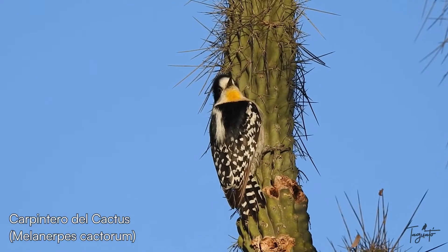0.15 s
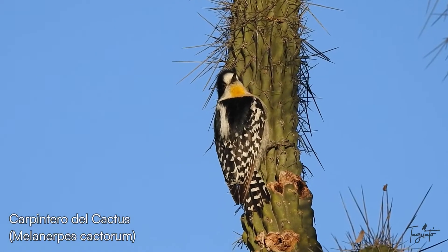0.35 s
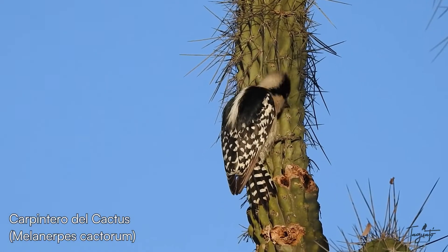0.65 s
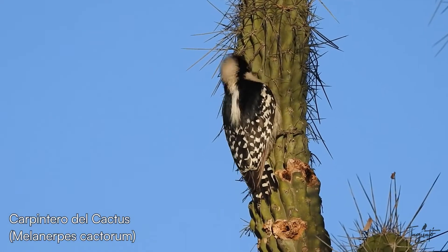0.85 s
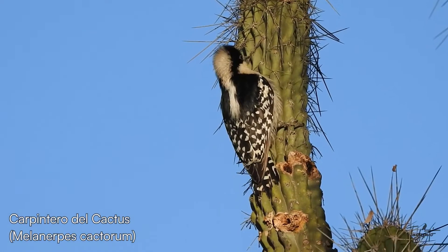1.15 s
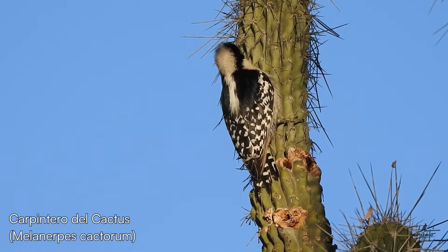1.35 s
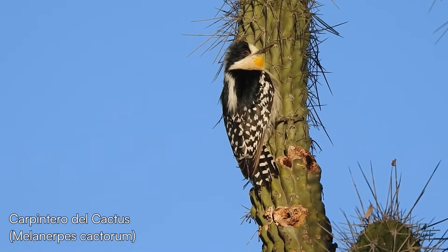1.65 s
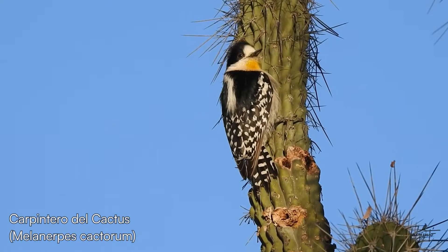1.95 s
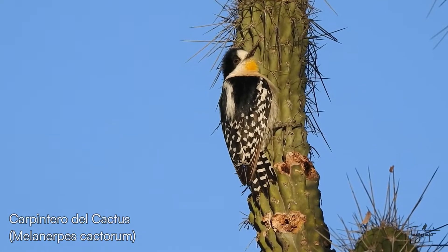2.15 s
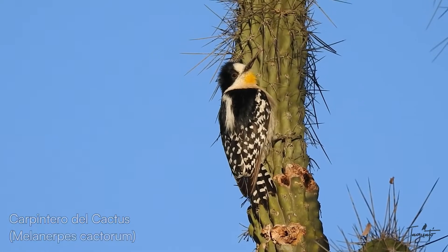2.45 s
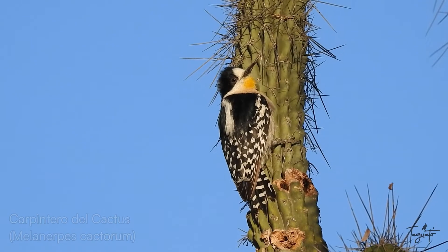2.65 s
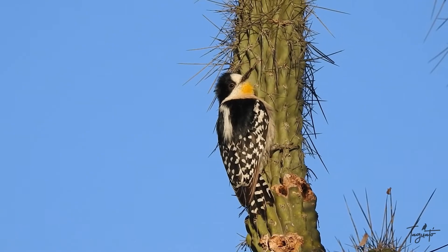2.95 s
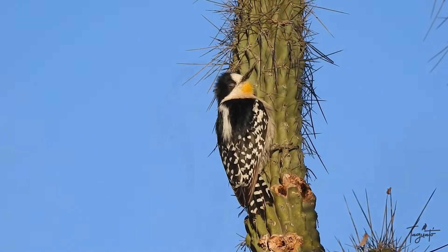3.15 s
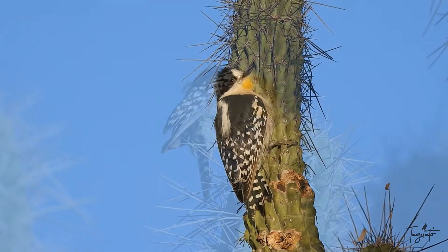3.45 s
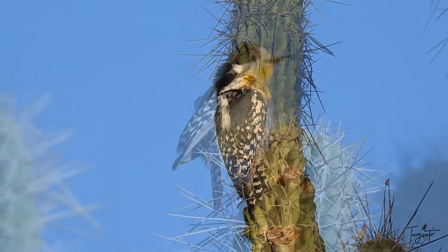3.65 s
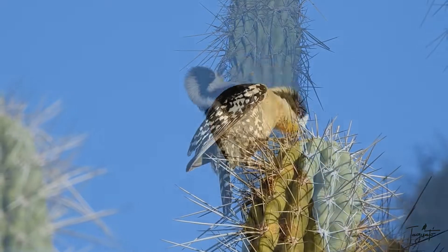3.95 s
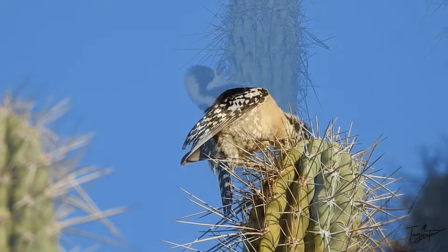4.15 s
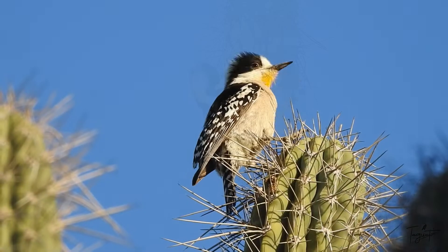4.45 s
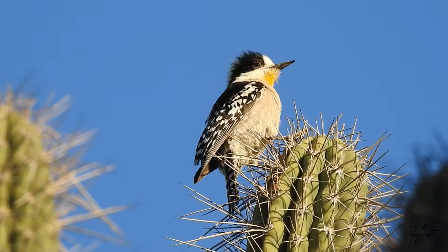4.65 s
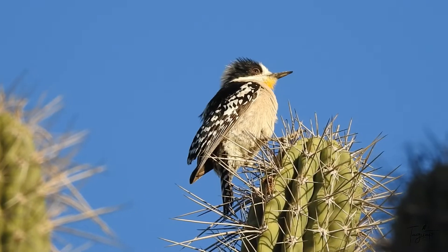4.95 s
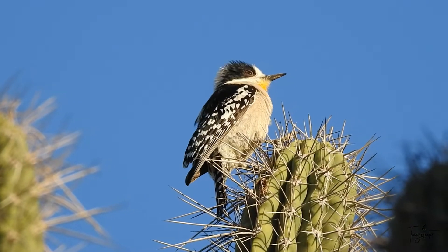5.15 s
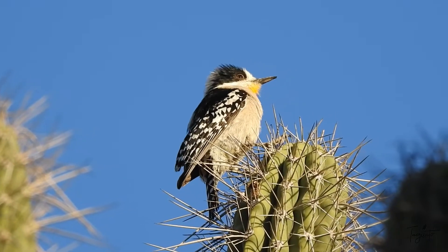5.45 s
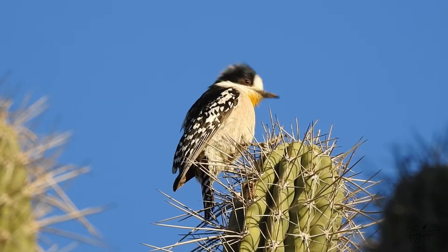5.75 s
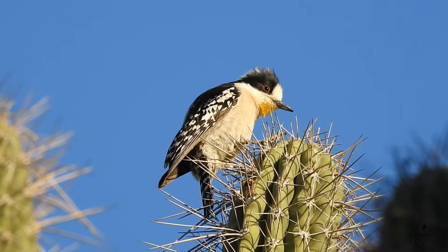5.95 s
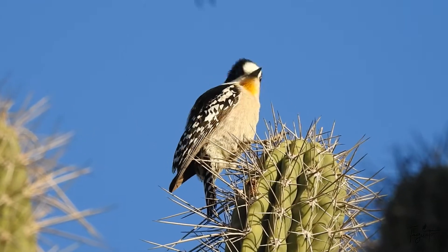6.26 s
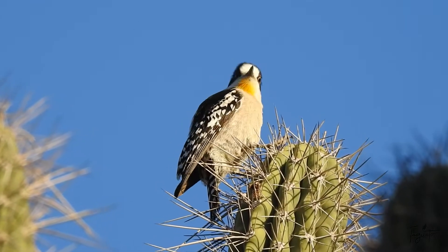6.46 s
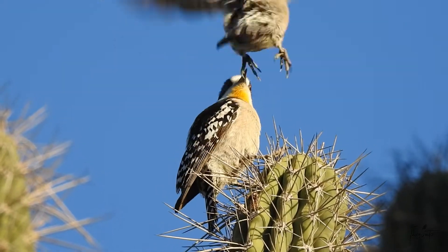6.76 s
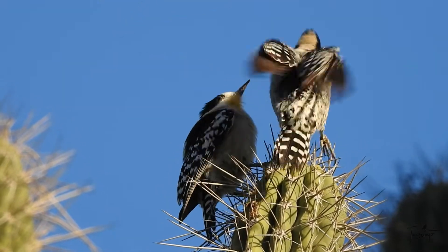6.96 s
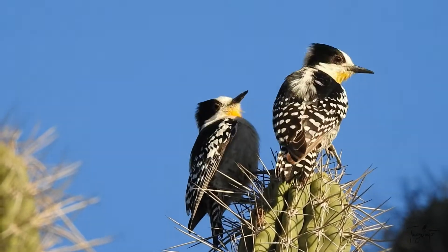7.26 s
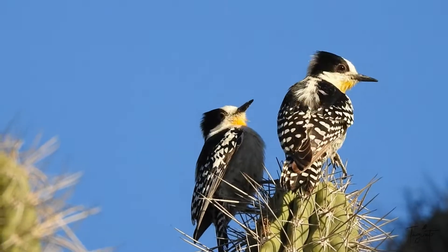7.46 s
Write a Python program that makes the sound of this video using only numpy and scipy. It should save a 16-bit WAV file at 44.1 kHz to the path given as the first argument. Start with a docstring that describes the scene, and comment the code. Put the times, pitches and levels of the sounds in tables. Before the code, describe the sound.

Woodpeckers chatter outdoors in overlapping bouts of high chirps and squealing notes, with distant whistles and rasps over a faint low hum.

```python
"""Short falling chirps and a slurred whistle come first: woodpeckers chatter in open scrub.
Then a bird near the microphone gives loud squealing notes in bouts, and the others answer.
Thin whistles, piping, small arched chirps and nasal rasps come from birds farther off. Each voice
is a vibrating membrane shaped by a throat, and ground and plants scatter its echoes.
A faint throbbing hum and a little air noise lie underneath."""
import sys
import numpy as np
from scipy import signal
from scipy.fft import rfft, irfft, next_fast_len
from scipy.io import wavfile

SR = 44100
rng = np.random.default_rng(int(sys.argv[2]) if len(sys.argv) > 2 else 0)


def wav_record(signal):
    """Record a signal, one row per channel, as 16-bit PCM in the file named by sys.argv[1]."""
    frames = np.transpose(np.atleast_2d(signal))
    bounded = np.clip(frames, -1, 1)
    # unit amplitude maps onto the largest positive 16-bit level
    quanta = np.round(bounded * 32767).astype(np.int16)
    wavfile.write(sys.argv[1], SR, quanta)


N = 336042
BAND_LIMIT_HZ, LEAD_S = 15660, .039

# The bird near the microphone, timed at the break of its voice: break_s, level_db, pitch_hz, squeal_s
NEAR_NOTES = [(2.483, -35, 1867, .022), (2.625, -35.5, 1860, 0.023), (2.772, -34.5, 1904, 0.017),
              (2.893, -34, 1934, .023), (3.04, -36.5, 1840, 0), (3.274, -34.5, 1908, 0.021),
              (3.411, -35.5, 1775, 0.0031), (3.767, -34.5, 1815, 0.0031), (3.894, -34, 1886, 0.024),
              (4.122, -37, 1870, .018), (4.251, -36, 1887, 0.00026), (4.385, -36.5, 1877, 0.0014),
              (4.721, -34.5, 1795, 0), (4.874, -35.5, 1757, 0), (5.146, -41, 1590, 0.021),
              (5.329, -44, 1586, 0.0013), (5.523, -35.5, 1763, 0.0019), (5.794, -36.5, 1848, .02),
              (6.505, -35, 1862, .026), (6.662, -35, 1805, 0), (6.812, -35, 1910, 0.02),
              (7.167, -35.5, 1780, 0), (7.588, -35, 1867, 0.02)]
def near_woodpecker(lead_follows=.6, usual_db=-37):
    """A grating lead-in breaks into a falling stack; in some notes a squeal takes its first part."""
    out = np.zeros(N)
    for break_s, db, hz, squeal_s in NEAR_NOTES:
        lead_db = usual_db + lead_follows * (db - usual_db)
        add(out, break_s - LEAD_S, gain_of(lead_db) * lead_in())
        add(out, break_s, gain_of(db) * fall(hz, squeal_s))
        if squeal_s > .005:
            add(out, break_s, gain_of(db) * squeal(hz, squeal_s))
    return out

# The near bird's throat in the lead-in: frequency_hz, gain_db
LEAD_THROAT = [(2350, 26), (4600, -4), (7000, -11), (9500, -49)]
def lead_in(top_hz=2386, arch=.061, rough=.34, hiss_db=-5.5, overlap_s=.0046):
    """A grating, hissy tone on a nearly level pitch swells up to the break of the voice."""
    t = np.arange(-LEAD_S, overlap_s, 1 / SR)
    u = np.linspace(0, 1, len(t))
    tone = syrinx(top_hz * (1 - arch * (2 * u - 1) ** 2), rough, LEAD_THROAT, order=4)
    level = gain_of(-11 + 6.5 * u) * gate(t, attack_s=.0063, release_s=.005)
    return level * (tone + gain_of(hiss_db) * hiss(len(t), low_hz=2800, high_hz=6300))

# The near bird's throat after the break: frequency_hz, gain_db
FALL_THROAT = [(1000, -33), (1450, -4.5), (1900, -14.5), (2900, 2), (3700, 2.5), (4500, -6.5), (5400, -0.5),
               (6300, -18.5), (7400, -18.5), (9200, -22.5), (11000, -52), (15000, -54)]
def fall(hz, squeal_s, length_s=.044, fade_db=-21.5, break_s=.0042, switch_s=.0023):
    """A stack of harmonics drops ever faster, fading and roughening; it waits out the squeal."""
    t = np.arange(0, length_s, 1 / SR)
    u = t / length_s
    pitch = hz * (1.06 - .18 * u - .4 * u ** 2)
    rough = .056 + .43 * u ** 3 + .46 * np.exp(-t / break_s)
    level = gain_of(3.5 + fade_db * u ** 2.49) * gate(t, attack_s=.0035, release_s=.0096)
    after_squeal = np.clip((t - squeal_s) / switch_s + 1, 0, 1)
    return level * after_squeal * syrinx(pitch, rough, FALL_THROAT)

# The throat in the near squeal and the distant arched chirps: frequency_hz, gain_db
SQUEAL_THROAT = [(3800, 1), (7600, -22), (11500, -34.5)]
def squeal(hz, length_s, arch=.071, flutter_hz=740, flutter_depth=.83, attack_s=.0023, hiss_db=-15):
    """A hissy tone an octave up; a second, slower vibration chops it and gives it side tones."""
    t = np.arange(0, length_s + attack_s, 1 / SR)
    u = t / length_s
    flanks = 1 - np.exp(-((u - .35) / .17) ** 2)  # zero where the squeal is cleanest and loudest
    turns = np.cumsum(flutter_hz * (1 + .15 * wobble(len(t), 680))) / SR
    flutter = 1 + flutter_depth * flanks * (np.cos(2 * np.pi * turns) + .27 * np.cos(4 * np.pi * turns))
    pitch = 2 * hz * (1.02 - arch * (2 * u - 1) ** 2)
    tone = syrinx(pitch, rough=.14, throat=SQUEAL_THROAT, order=3) * flutter
    tone = gain_of(7.5 - 8.5 * flanks) * unit_rms(resonate(tone, hz=2600, width_hz=1900))
    noise = gain_of(hiss_db) * hiss(len(t), low_hz=4800, high_hz=7400)
    return gate(t, attack_s, release_s=.0044) * (tone + noise)

# Woodpeckers answering from the scrub: time_s, level_db, nominal_second_harmonic_hz
ANSWERS = [(0.0014, -36.5, 4720), (0.178, -35, 4695), (0.3613, -32.5, 4885), (0.564, -38, 4735),
           (0.7416, -34.5, 4860), (0.9438, -34, 4870), (1.0184, -43.5, 5490), (1.1104, -32.5, 5050),
           (1.1978, -38.5, 4980), (1.2746, -32.5, 4950), (1.3433, -39, 4920), (1.4581, -33.5, 4760),
           (1.6127, -40, 4830), (1.6457, -34.5, 4890), (1.7376, -41.5, 4840), (1.8445, -37, 4680),
           (1.8842, -38.5, 5000), (2.0148, -32, 4920), (2.1495, -43, 4980), (2.1925, -37, 4716),
           (2.3596, -38, 4910), (2.5264, -38.5, 4990), (2.7354, -39, 4990), (4.2106, -36, 4820),
           (4.5412, -34, 4917), (4.6936, -35, 4896), (4.8316, -33.5, 4870), (4.9807, -33.5, 4860),
           (5.1384, -31.5, 4925), (5.297, -33.5, 4950), (5.4755, -36, 4650), (5.646, -33.5, 4700),
           (5.8122, -33.5, 4796), (5.9389, -43, 4605), (6.0737, -37.5, 4860), (6.2228, -40.5, 4760),
           (6.364, -41, 4910), (7.0984, -35.5, 4910), (7.2884, -36.5, 4920), (7.4785, -38, 5080)]
# Their throats: frequency_hz, gain_db
ANSWER_THROAT = [(1700, 0), (2450, -6.5), (3500, -14), (4300, 6), (5100, 1.5), (6000, -12), (7400, -21),
                 (8700, -21), (10000, -27.5), (14000, -35)]
def answering_woodpeckers(usual_s=.1, head_s=.016, step=.085, sag_per_s=1.3, usual_db=-34.5):
    """Each chirp starts clean and loud, then slides down and turns hoarse; length and roughness vary."""
    out = np.zeros(N)
    for (s, db, hz), (longer, rougher) in zip(ANSWERS, rng.uniform(-1, 1, (len(ANSWERS), 2))):
        t = np.arange(0, usual_s * (1 + .16 * longer), 1 / SR)
        head = np.exp(-(t / head_s) ** 3)
        tail = 1 - head
        pitch = hz / 2 * (1.02 - step * tail - sag_per_s * t)
        # the tail's level varies less from chirp to chirp than the head's
        tail_db = -46 + .49 * (db - usual_db) - 18 * (t / t[-1]) ** 2
        level = gain_of(head * (db - 3.5) + tail * tail_db) * gate(t, attack_s=.0029, release_s=.011)
        rough = (.08 * head + .3 * tail) * (1 + .4 * rougher)
        tone = syrinx(pitch, rough, ANSWER_THROAT, shimmer=1.32, shimmer_hz=220, order=5)
        add(out, s - .002, level * tone)
    return out

# Long thin whistles from farther off: start_s, length_s, level_db
SINKING_WHISTLES = [(3.185, 0.46, -42.5), (6.361, .42, -36.5)]
# The throat in these and in the scolding overtone: frequency_hz, gain_db
THIN_THROAT = [(6000, 1), (10000, -36), (11700, -28), (15000, -50)]
def thin_whistles(settled_hz=5160, settle_s=.075, scoop_s=.009, held_db=-48, loud_s=.11):
    """High whistles that scoop up, settle lower and thin out as they sag."""
    out = np.zeros(N)
    for s, length, db in SINKING_WHISTLES:
        t = np.arange(0, length, 1 / SR)
        hz = settled_hz + 1200 * np.exp(-t / settle_s) - 1296 * np.exp(-t / scoop_s) - 2000 * t ** 2
        level_db = held_db + (db - held_db) * np.exp(-(t / loud_s) ** 4) - 9 * t
        level = gain_of(level_db) * gate(t, attack_s=.015, release_s=.048)
        add(out, s, level * wavering_tone(hz, THIN_THROAT))
    return out

# The overtone of a distant scolding call: time_s, pitch_hz, level_db
OVERTONE_COURSE = [(6.82, 5050, -47), (6.845, 5140, -40), (6.88, 5330, -48), (6.98, 5720, -62)]
def scolding_overtone():
    """The bright rising overtone of a nasal scolding call."""
    out = np.zeros(N)
    t, hz, db = tracks(OVERTONE_COURSE)
    add(out, t[0], gain_of(db) * wavering_tone(hz, THIN_THROAT))
    return out

# The course of a distant slurred whistle: time_s, pitch_hz, level_db
SLUR_COURSE = [(.145, 3026, -59), (.152, 2900, -39.5), (.185, 2387, -35), (.215, 2060, -41.5),
               (.226, 1260, -46.5), (.308, 1267, -51), (.316, 1660, -45), (.328, 2400, -56)]
# Distant piping: start_s, length_s, first_pitch_hz, last_pitch_hz, level_db
PIPING_NOTES = [(0, 0.023, 1315, 1310, -43.5), (0.029, 0.025, 1190, 1174, -50.5),
                (.345, .028, 1363, 1295, -45.5), (.378, 0.026, 1205, 1170, -54.5),
                (2.28, 0.146, 1856, 1834, -63.5), (3.45, 0.29, 1615, 1380, -67),
                (4.012, 0.18, 2030, 2054, -59.5)]
# The throat behind both kinds: frequency_hz, gain_db
LOW_THROAT = [(1250, 10), (2000, -4.5), (2800, 0.5), (4000, -21), (5500, -15.5), (7500, -16), (9000, -27),
              (13000, -40)]
def low_whistles():
    """One whistle that dives, holds and flicks up, and some plain piping notes."""
    out = np.zeros(N)
    voice = dict(throat=LOW_THROAT, rough=.24, waver=.25, waver_hz=120)
    t, hz, db = tracks(SLUR_COURSE)
    add(out, t[0], gain_of(db) * wavering_tone(hz, **voice))
    for s, length, first_hz, last_hz, db in PIPING_NOTES:
        t = np.arange(0, length, 1 / SR)
        hz = last_hz + (first_hz - last_hz) * (1 - t / length) ** 2
        add(out, s, gain_of(db) * gate(t, attack_s=.0048, release_s=.0092) * wavering_tone(hz, **voice))
    return out

# Small chirps far from the microphone: start_s, level_db
FAR_CHIRPS = [(.01, -48.5), (.365, -49), (.425, -50), (.678, -51), (1.066, -50), (1.354, -48),
              (1.76, -47.5), (2.172, -49), (3.108, -50), (3.81, -51), (4.485, -50), (4.769, -47),
              (5.2, -51.5), (5.579, -49), (5.935, -50)]
def arched_chirps(usual_s=.068, top_hz=3980, rise=.27, rough=.355):
    """Small chirps that swing up and down again, each a little different."""
    out = np.zeros(N)
    for (s, db), (longer, higher) in zip(FAR_CHIRPS, rng.uniform(-.98, 1, (len(FAR_CHIRPS), 2))):
        size = int(usual_s * (1 + .119 * longer) * SR)
        arc = np.sin(np.linspace(0, np.pi, size)).clip(0)
        hz = top_hz * (1 + .02 * higher) * (1 - rise * (1 - arc))
        add(out, s, gain_of(db - 1.5) * np.sqrt(arc) * syrinx(hz, rough, SQUEAL_THROAT, order=2))
    return out

# Birds scolding deeper in the scrub: start_s, length_s, level_db, pitch_hz
FAR_RASPS = [(0.029, .12, -51, 430), (0.462, .14, -50.5, 622), (0.531, 0.27, -46, 434),
             (1.049, 0.46, -51.5, 426), (2.761, 0.18, -51, 595), (4.102, 0.14, -46.5, 592),
             (4.221, 0.32, -45.5, 437), (4.88, 0.26, -49, 427), (5.322, 0.35, -50.5, 430),
             (5.786, 0.16, -49, 489), (5.917, 0.27, -49, 428), (6.82, .3, -47.5, 699.3),
             (7.371, 0.3, -47, 429)]
# Their throats: frequency_hz, gain_db
RASP_THROAT = [(1200, -44), (2050, -14), (2600, -17), (3500, -10), (4400, -1), (5100, 0.5), (5700, -7.5),
               (6400, -18), (8000, -27.5), (10000, -33.5), (14000, -42)]
def rasps(peak_share=.46, sag=.1, jitter=.0126, flicker=.5, flicker_hz=70):
    """Harsh nasal scolding: a dense stack that arches in pitch, each harmonic flickering on its own."""
    out = np.zeros(N)
    for s, length, db, hz in FAR_RASPS:
        t, swell_db, side = tracks([(s, -9, -.6), (s + peak_share * length, 0, 0), (s + length, -13, 1)])
        pitch = hz * (1 - sag * side ** 2) * (1 + jitter * wobble(len(t), 306))
        turns = np.cumsum(pitch) / SR
        stack = np.zeros(len(t))
        for k in range(3, 22):
            strength = gains_at(RASP_THROAT, k * pitch) * np.exp(flicker * wobble(len(t), flicker_hz))
            stack += strength * np.sin(2 * np.pi * (k * turns + rng.random()))
        add(out, s, gain_of(db + swell_db) * unit_rms(stack) * signal.windows.tukey(len(t), .15))
    return out

# Slow drift in the timing of the throbs: time_s, lateness_s
THROB_LAG = [(0, .016), (2.2, .064), (3.1, .067), (3.9, .056), (5.7, .106), (6.4, .107), (7.62, .094)]
# The hum's resonances: frequency_hz, width_hz, gain_db
HUM_RESONANCES = [(142.8, 28, 3), (310, 62, -14)]
# The hum at the microphone: time_s, level_db
HUM_LEVEL = [(0, -64.5), (1.6, -64.5), (2.7, -59), (3.8, -60.5), (4.8, -62), (6.2, -63), (7.62, -63)]
def hum(throbs_per_s=24.71):
    """Nearly regular soft knocks ring two low resonances and merge into a throbbing hum."""
    t = np.arange(N) / SR
    count = np.floor(throbs_per_s * (t - np.interp(t, *np.transpose(THROB_LAG))))
    knocks = np.diff(count, prepend=count[0])
    body = sum(gain_of(db) * resonate(resonate(knocks, hz, width), hz, 3 * width)
               for hz, width, db in HUM_RESONANCES)
    return gain_of(np.interp(t, *np.transpose(HUM_LEVEL))) * unit_rms(body)

# Open air over the scrub: frequency_hz, relative_density_db
AIR_SPECTRUM = [(25, -3), (70, 0.5), (250, -3), (450, -7.5), (700, -10.5), (1050, -4), (1500, -9),
                (2100, -4.5), (3000, -9.5), (4600, 1.5), (6500, -11.5), (9000, -21), (12000, -28),
                (15500, -25)]
# The air at the microphone: time_s, level_db
AIR_LEVEL = [(0, -59.5), (1.8, -61.5), (2.701, -59), (4.5, -58.5), (6.2, -61)]
def air(drift_db=1, drift_hz=5.7):
    """Soft outdoor noise whose level drifts a little."""
    colour = gains_at(AIR_SPECTRUM, np.fft.rfftfreq(N, 1 / SR))
    noise = irfft(rfft(rng.standard_normal(N)) * colour, N)
    level_db = np.interp(np.arange(N) / SR, *np.transpose(AIR_LEVEL)) + drift_db * wobble(N, drift_hz)
    return gain_of(level_db) * unit_rms(noise)

def scrub(x, early_db, late_db, early_t60_s=.16, late_t60_s=.24, echoes_per_s=3000):
    """Ground and plants scatter a quick cluster of echoes and a faint longer tail."""
    t = np.arange(SR // 2) / SR
    taps = rng.standard_normal(len(t)) * (rng.random(len(t)) < echoes_per_s / SR) * (t > .003)
    early = taps * gain_of(-60 * t / early_t60_s)
    late = taps * gain_of(-60 * t / late_t60_s) * (t > .02)
    echo = gain_of(early_db) * early / np.linalg.norm(early)
    echo += gain_of(late_db) * late / np.linalg.norm(late)
    return x + signal.fftconvolve(x, echo)[:N]

def syrinx(hz, rough, throat, jitter=.14, jitter_hz=900, shimmer=.8, shimmer_hz=350, order=9):
    """Harmonics of a vibrating membrane, shaped by the throat; roughness shakes pitch and strength."""
    turns = np.cumsum(hz * (1 + jitter * rough * wobble(len(hz), jitter_hz))) / SR
    k = np.arange(1, order + 1)[:, None]
    heights = gains_at(throat, k * hz) * (k * hz < BAND_LIMIT_HZ)
    tone = (heights * np.sin(2 * np.pi * k * turns)).sum(0) / np.linalg.norm(heights, axis=0)
    return unit_rms(tone * np.exp(shimmer * rough * wobble(len(hz), shimmer_hz)))

def wavering_tone(hz, throat, rough=.158, waver=.35, waver_hz=90):
    """A nearly pure tone whose strength wavers."""
    return unit_rms(syrinx(hz, rough, throat, order=5) * np.exp(waver * wobble(len(hz), waver_hz)))

def hiss(size, low_hz, high_hz):
    """A band of noise of rms 1."""
    band = signal.butter(3, [low_hz, high_hz], "band", fs=SR)
    return unit_rms(signal.lfilter(*band, rng.standard_normal(size)))

def wobble(size, hz):
    """Random motion of rms 1, mostly slower than hz."""
    n = next_fast_len(size)
    f = np.fft.rfftfreq(n, 1 / SR)
    return unit_rms(irfft(rfft(rng.standard_normal(n)) * np.exp(-(f / hz) ** 2), n)[:size])

def resonate(x, hz, width_hz):
    """A resonance of gain 1."""
    return signal.lfilter(*signal.iirpeak(hz, hz / width_hz, fs=SR), x)

def gate(t, attack_s, release_s):
    """Opens at the start of the times t and closes at their end."""
    return np.clip((t - t[0]) / attack_s, 0, 1) * np.clip((t[-1] - t) / release_s, 0, 1)

def gain_of(db):
    """Decibels to gain."""
    return 10 ** (np.asarray(db) / 20)

def unit_rms(x):
    """Scales to rms 1."""
    return x / np.sqrt(np.mean(x ** 2) + 1e-20)

def gains_at(spectrum, hz):
    """A spectrum table as gains at the given frequencies."""
    f, db = np.transpose(spectrum)
    return gain_of(np.interp(np.log(hz + 1), np.log(f), db))

def tracks(rows):
    """A curve table as sample times and one track for each further column."""
    s, *columns = np.transpose(rows)
    t = np.arange(s[0], s[-1], 1 / SR)
    return [t] + [np.interp(t, s, c) for c in columns]

def add(mix, s, sound):
    """Mixes a sound in at time s."""
    at = round(s * SR)
    sound = sound[max(-at, 0):]
    part = mix[max(at, 0):][:len(sound)]
    part += sound[:len(part)]

def scene():
    """One microphone in open scrub: the farther birds carry more echo; hum and air lie underneath."""
    near = scrub(near_woodpecker(), early_db=-13, late_db=-24)
    answers = scrub(answering_woodpeckers(), early_db=-8, late_db=-21)
    far_calls = thin_whistles() + scolding_overtone() + low_whistles() + arched_chirps() + rasps()
    far = scrub(far_calls, early_db=-8, late_db=-18)
    return (near + answers + far + hum() + air())[None]

def record(dry):
    """The recorder's band limit cuts the highest treble."""
    lowpass = signal.firwin(511, BAND_LIMIT_HZ, window=("kaiser", 9), fs=SR)
    return signal.oaconvolve(dry, lowpass[None], "same")

dry = scene()
out = record(dry)
wav_record(out)
```